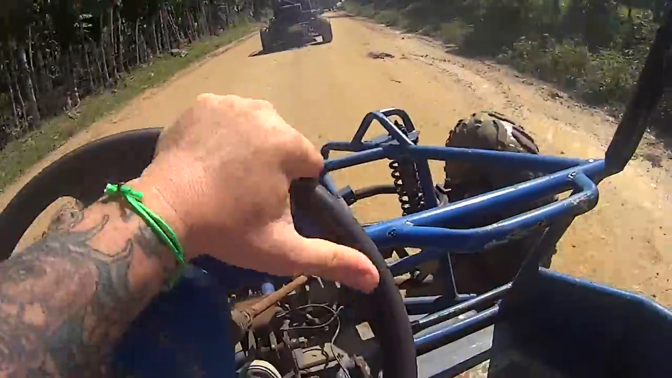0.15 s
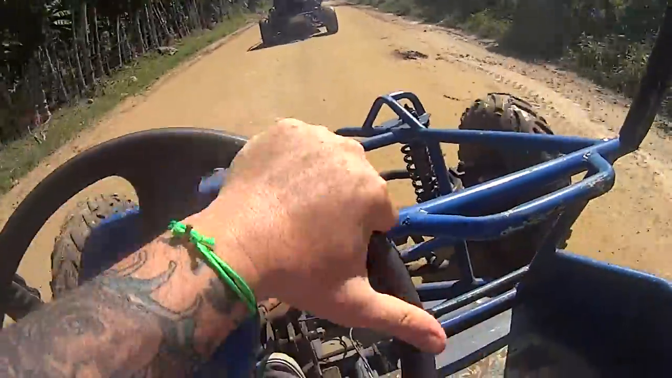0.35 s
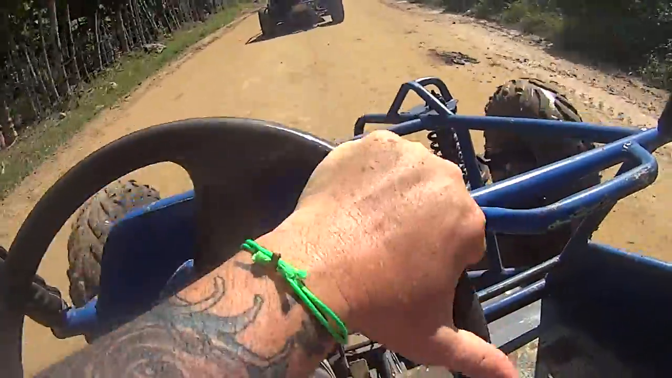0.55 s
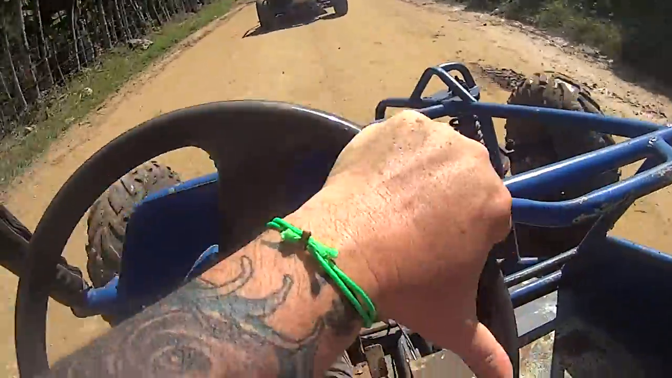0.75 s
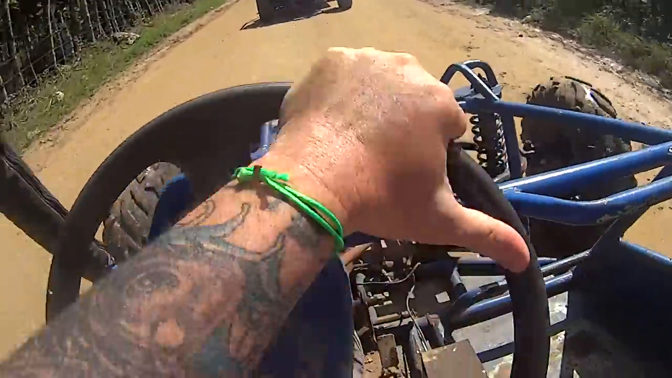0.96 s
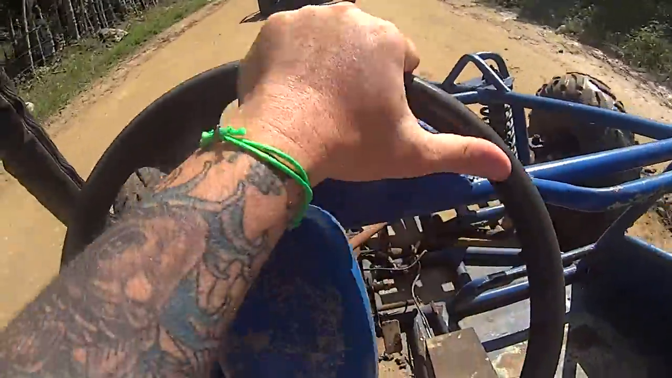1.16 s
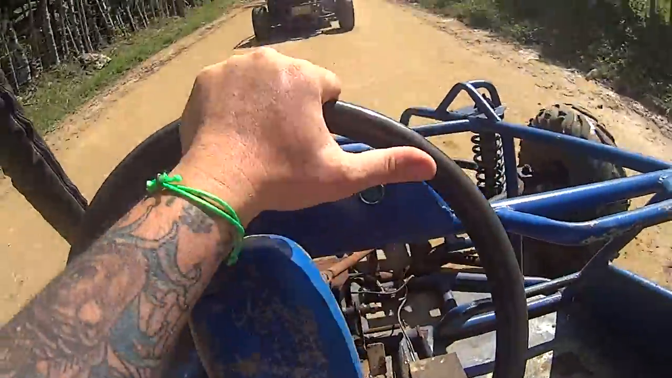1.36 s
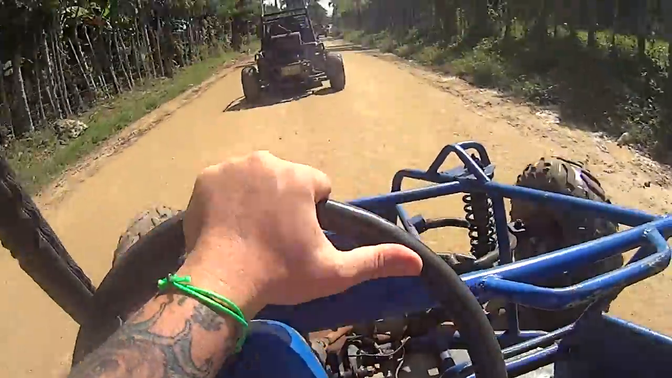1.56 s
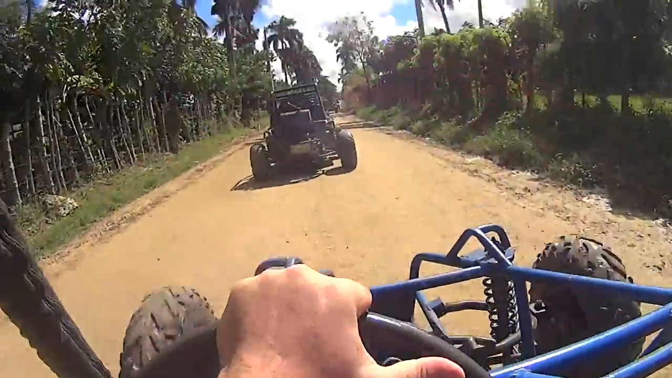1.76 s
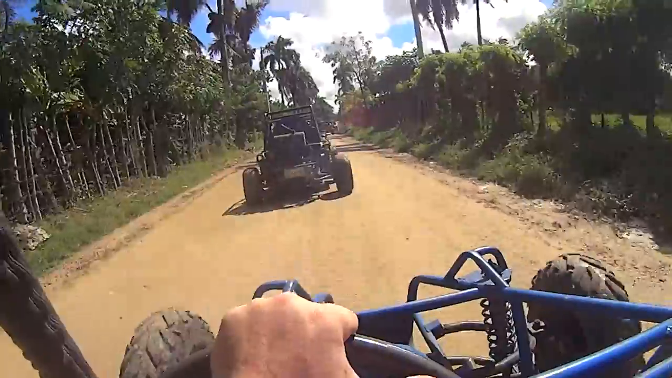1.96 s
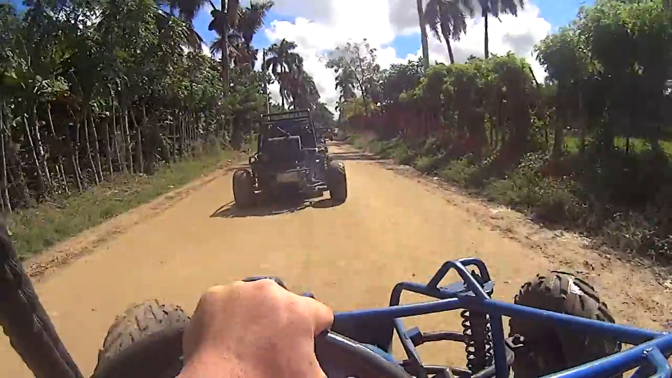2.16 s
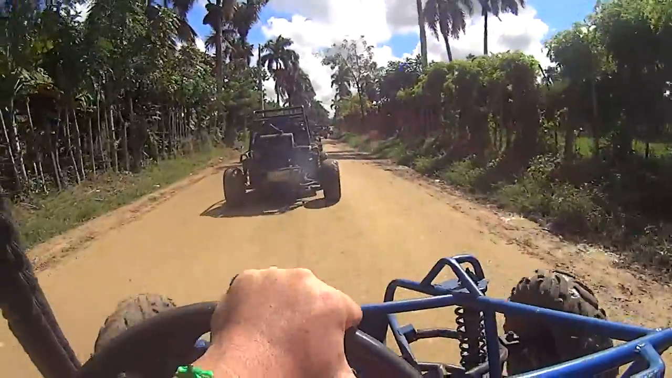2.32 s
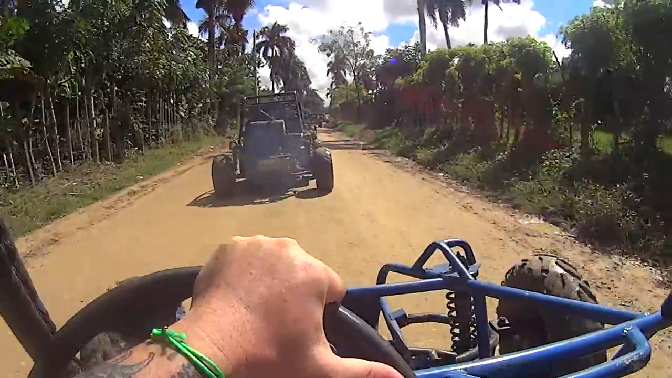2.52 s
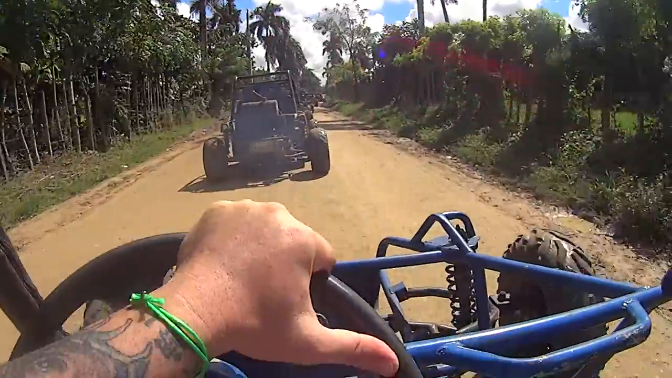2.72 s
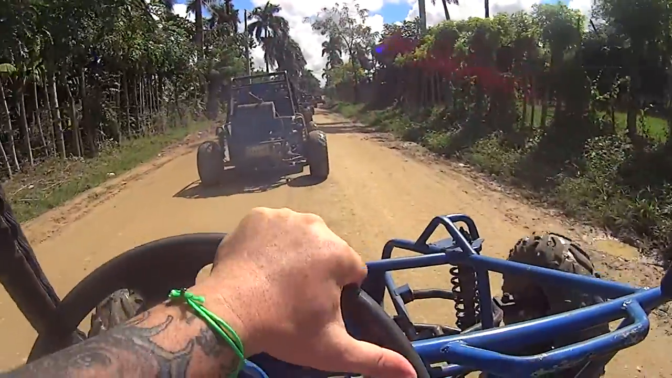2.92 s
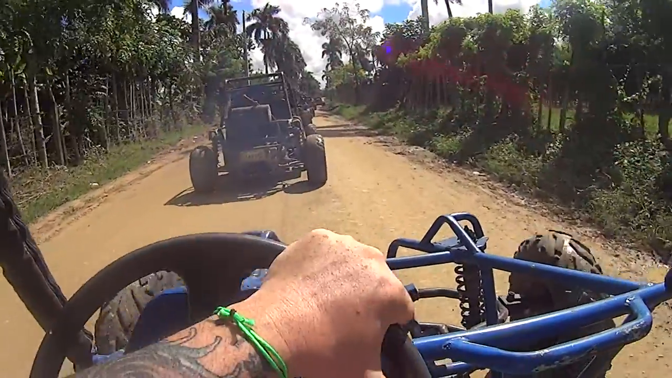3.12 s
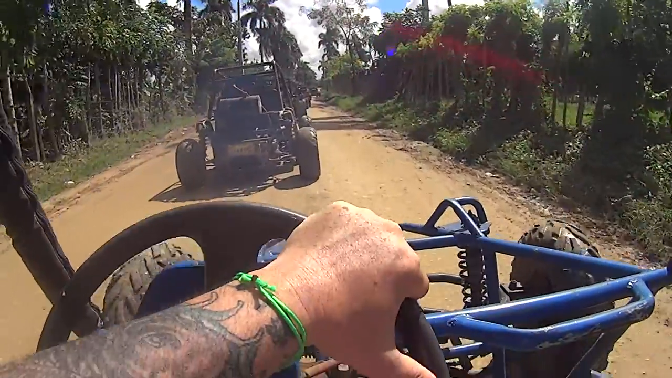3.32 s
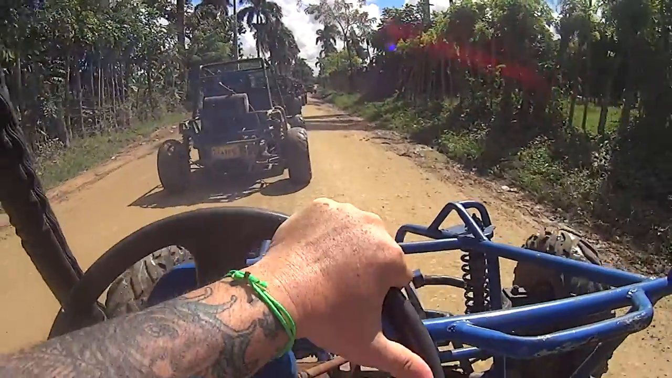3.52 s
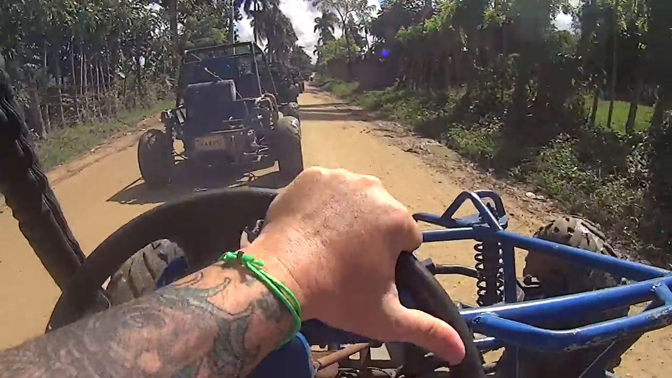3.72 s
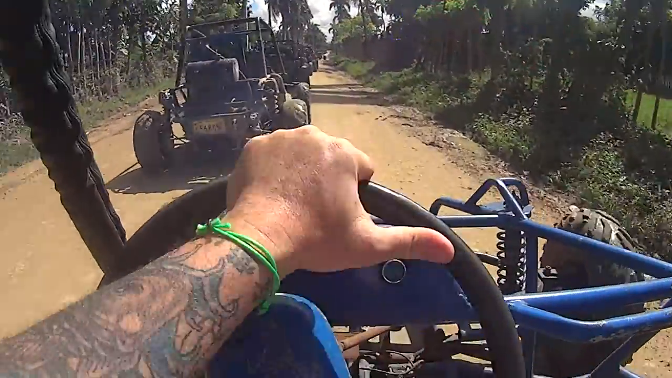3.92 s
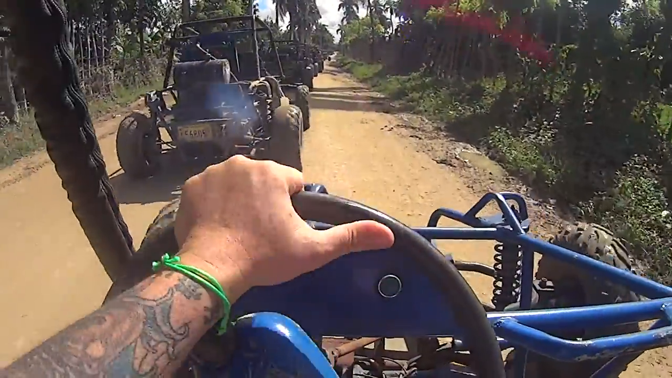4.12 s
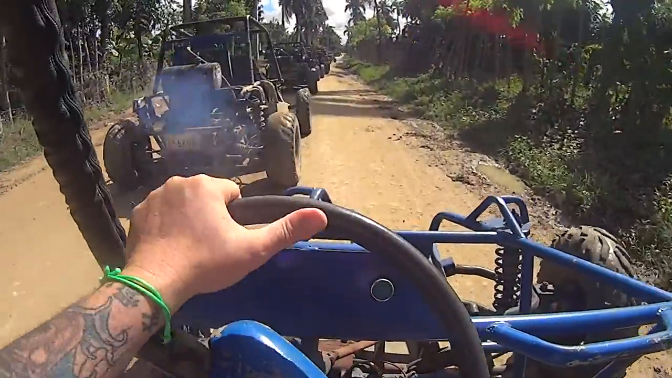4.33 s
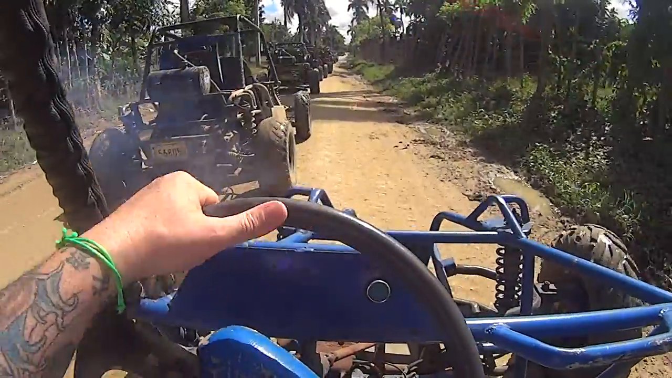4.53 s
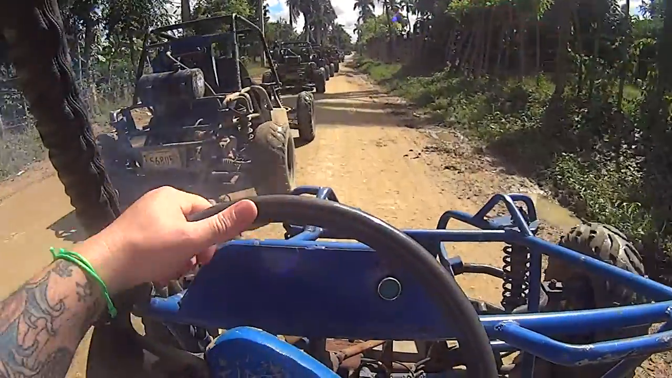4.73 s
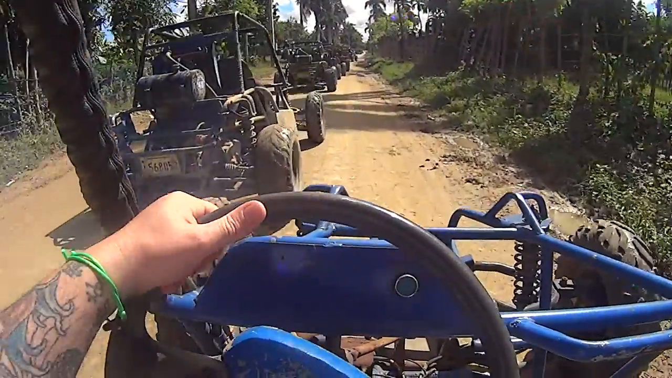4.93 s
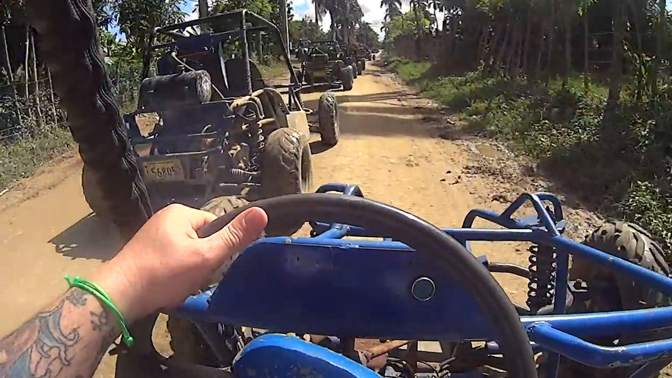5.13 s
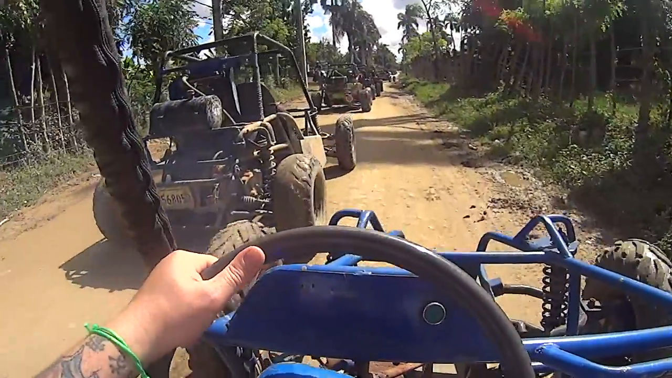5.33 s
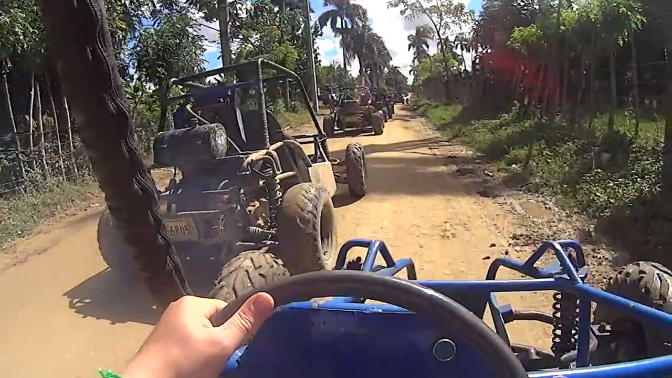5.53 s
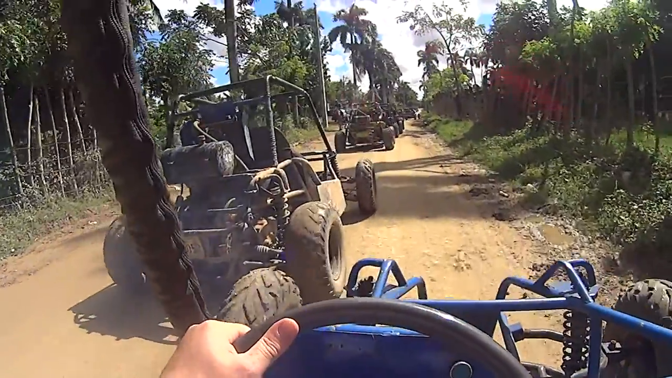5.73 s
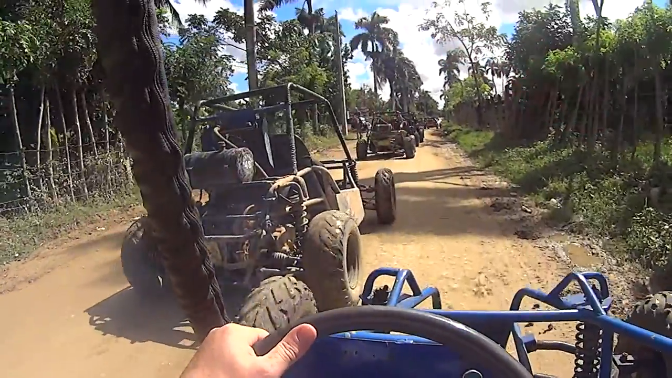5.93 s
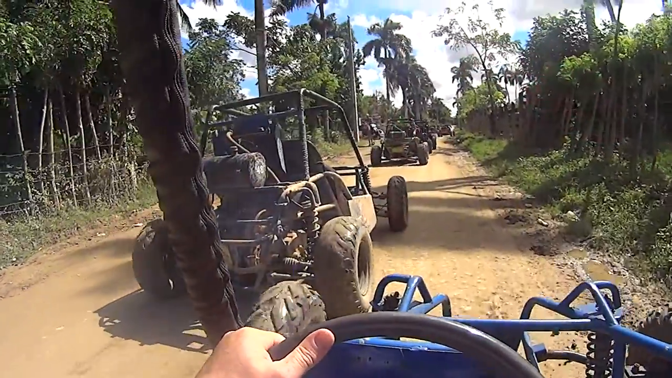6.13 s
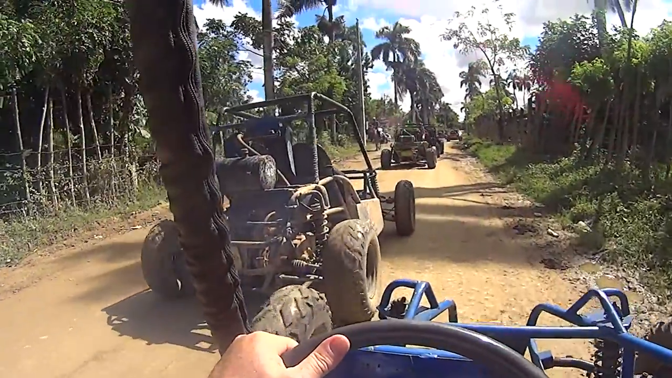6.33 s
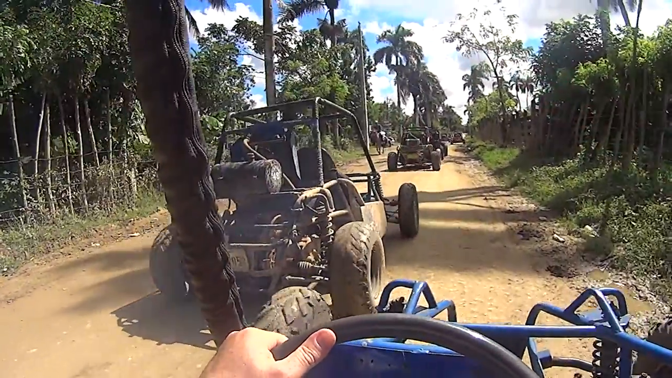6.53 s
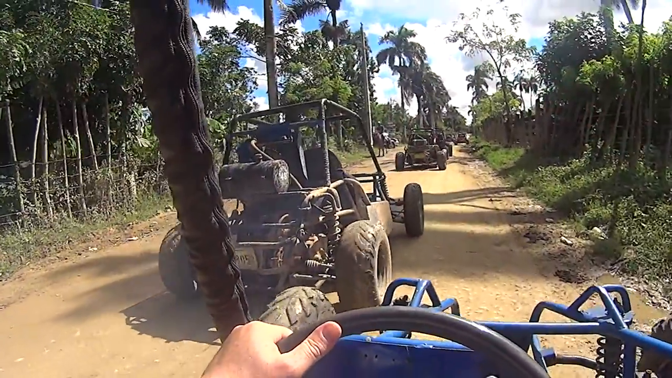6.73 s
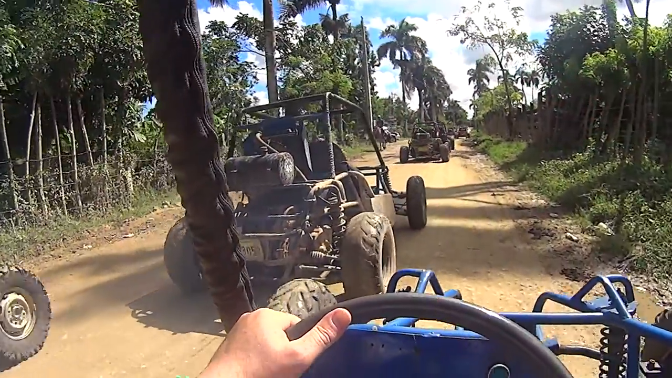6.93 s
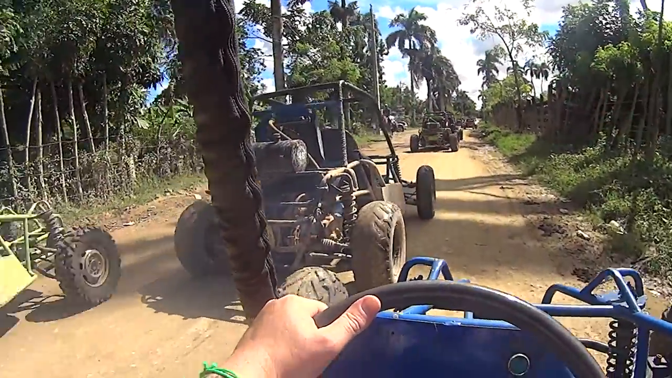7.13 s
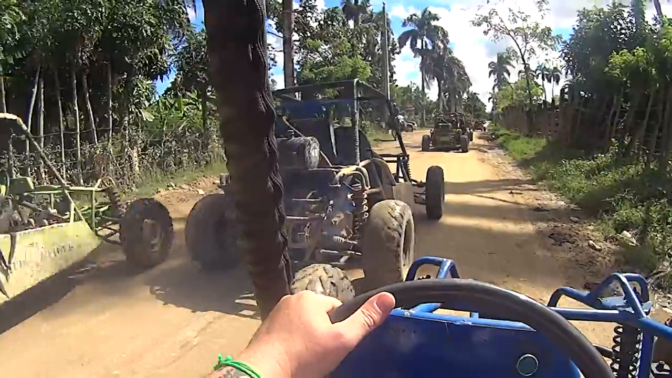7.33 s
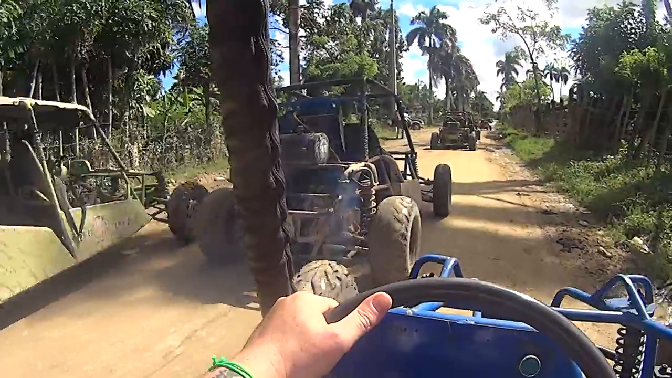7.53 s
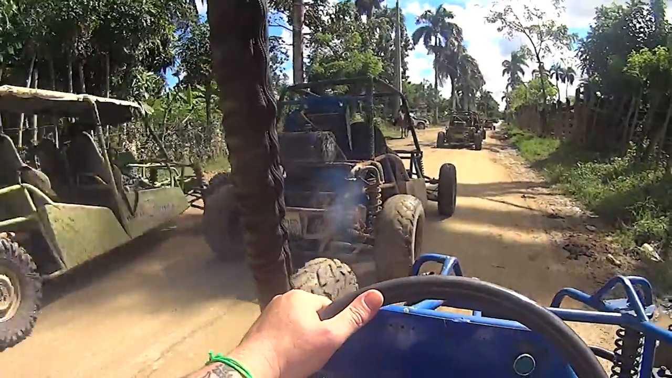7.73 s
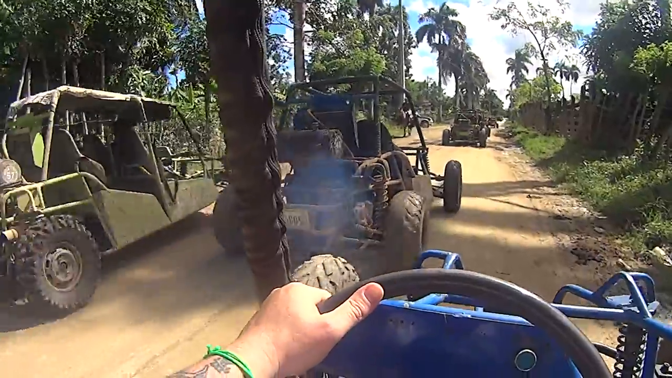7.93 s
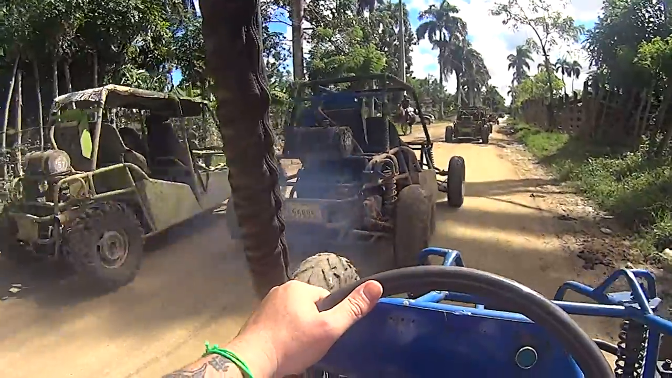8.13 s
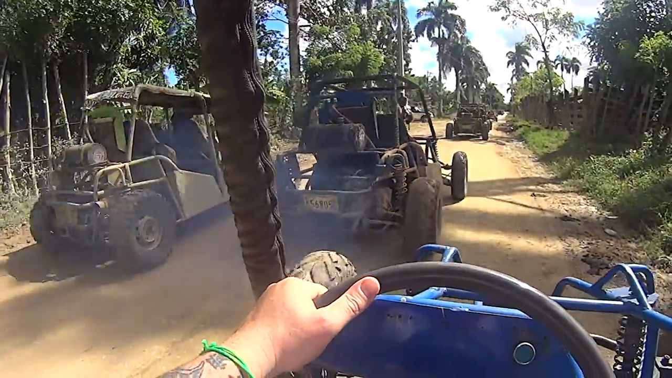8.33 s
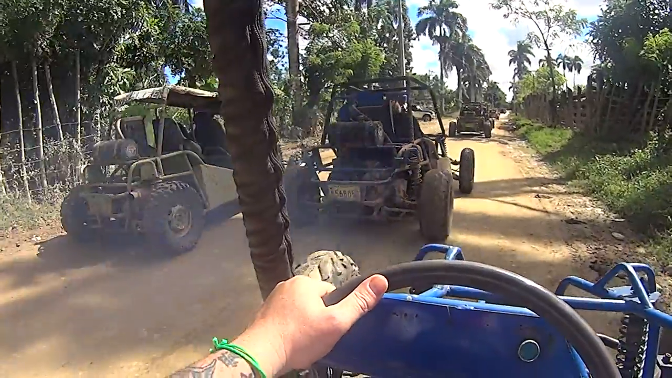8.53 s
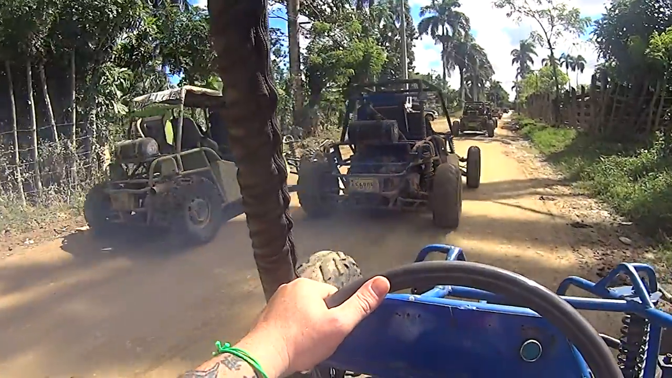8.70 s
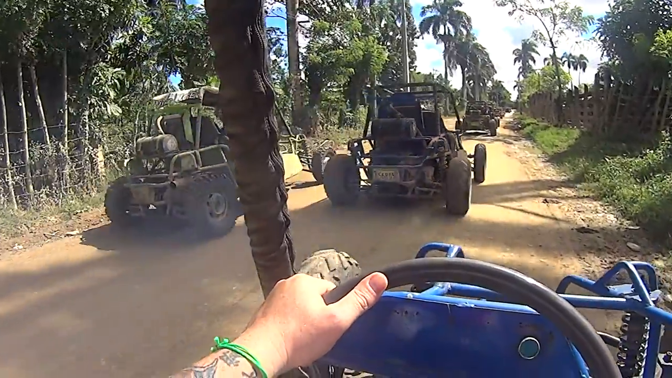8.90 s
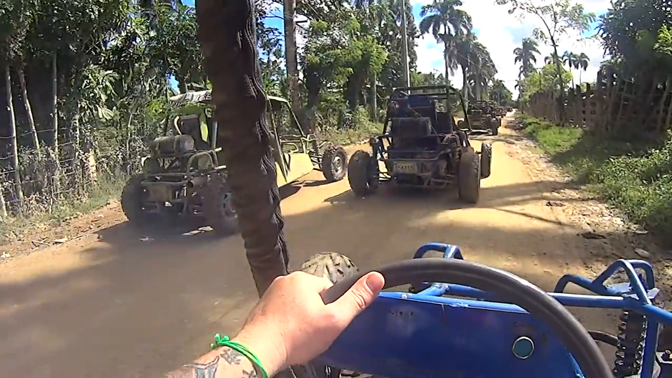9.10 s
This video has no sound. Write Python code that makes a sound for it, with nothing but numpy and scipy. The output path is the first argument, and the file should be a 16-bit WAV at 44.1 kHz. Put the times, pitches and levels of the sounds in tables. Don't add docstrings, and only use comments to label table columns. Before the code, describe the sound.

Boxy, ringing onboard sound of a buggy: raspy throttle bursts, falling coasts, a quieter lull, then a rough, popping final acceleration over low road rumble.

```python
import sys
import numpy as np
from scipy import signal
from scipy.fft import rfft, irfft, next_fast_len
from scipy.io import wavfile
from scipy.ndimage import uniform_filter1d, map_coordinates

SR = 44100
rng = np.random.default_rng(int(sys.argv[2]) if len(sys.argv) > 2 else 0)


def store_wav(level_fs):
    pcm = np.round(np.clip(np.atleast_2d(level_fs), -1, 1) * 32767)
    wavfile.write(sys.argv[1], SR, pcm.T.astype(np.int16))


def gain_from_decibels(decibels):
    exponent = np.asarray(decibels, float) / 20
    return 10 ** exponent


N = 403956


def unit(x):
    return x / np.sqrt(np.mean(x ** 2) + 1e-20)


def along(points, hz):
    f, v = np.transpose(points)
    return np.interp(np.log(hz + 1), np.log(f + 1), v)


def curves(rows):
    s, *cols = np.transpose(rows)
    return [np.interp(np.arange(N) / SR, s, c) for c in cols]


def fade(rows, soft_s):
    a, b = rows[0][0], rows[-1][0]
    return np.interp(np.arange(N) / SR, [a - soft_s, a, b, b + soft_s], [0, 1, 1, 0])


def wobble(rate_hz):
    knots = rng.standard_normal(int(N * rate_hz / SR) + 4)
    return map_coordinates(knots, [np.arange(N) * rate_hz / SR])


def filtered(x, response):
    m = next_fast_len(N + SR // 2)
    return irfft(rfft(x, m) * response(np.fft.rfftfreq(m, 1 / SR)), m)[..., :N]


def resonance(f, centre_hz, width_hz):
    damping = 1j * f * width_hz
    return damping / (centre_hz ** 2 - f * f + damping)


def modes(rows):
    return lambda f: sum(gain_from_decibels(db) * resonance(f, c, w) for c, w, db, *_ in rows)


def blows(events, over_db):
    s, db = np.transpose(events)
    return np.bincount(np.round(s * SR).astype(int), gain_from_decibels(db + over_db), N)


# [f/Hz, share 0-1]
COMMON_SHARE = [(80, .7), (400, .6), (650, .5), (900, .88), (1300, .85), (1480, .998), (1850, .996),
                (2400, .9), (3500, .7), (5200, .88), (7000, .5), (10000, .3)]


def ports(x, response):
    m = next_fast_len(N + SR // 2)
    f = np.fft.rfftfreq(m, 1 / SR)
    z, h = rfft(x, m), response(f)
    share = np.clip(along(COMMON_SHARE, f), 0, 1)
    pair = np.sqrt(share) * z[0] + np.sqrt(1 - share) * z[1:]
    return irfft(pair * h / np.sqrt(np.mean(np.abs(h) ** 2)), m)[:, :N]


# [f/Hz, width/Hz, left level/dB, right level/dB, left sign, right sign]
SHELL = [(896, 160, -17, -16.5, 1, 1), (1030, 106, -13, -20, -1, -1), (1280, 73, -16, -19, 1, 1),
         (1526, 63.5, 2.5, 3.5, 1, 1), (1653.6, 70.5, 0.5, -0.5, -1, -1), (1782, 55, -4.5, -6.5, 1, 1),
         (1957, 390, -19, -25, -1, -1), (2356, 74, -15, -29.5, -1, 1), (2640, 350, -20, -24, 1, -1),
         (2663, 360, -21.5, -21, -1, 1), (3220, 520, -18, -19.5, 1, -1), (4070, 380, -23.5, -18.5, -1, 1),
         (4365, 530, -21.5, -23, 1, -1), (5070, 493, -20.5, -14, 1, 1), (5350, 1050, -25, -18.5, -1, -1),
         (7140, 140, -45.5, -47, 1, -1), (7730, 495, -31, -28.5, -1, -1), (9190, 470, -29.5, -39.5, 1, 1),
         (9580, 4400, -38, -37, -1, 1)]


def shell(f):
    return sum(gain_from_decibels([[l], [r]]) * [[a], [b]] * resonance(f, c, w) for c, w, l, r, a, b in SHELL)


# [t/s, firing f/Hz]
SPEED = [(0, 27.2), (0.558, 43.97), (0.891, 35.07), (1.099, 41.74), (1.399, 78.74), (1.74, 113.6),
         (1.981, 95.8), (2.41, 134), (3.05, 92.28), (3.92, 46.67), (4.5, 105.7), (4.85, 86.4),
         (5.66, 133.5), (6.15, 101.4), (7.62, 25.44), (8.071, 59.53), (8.291, 65.37), (9.16, 73.17)]
# [open t/s, shut t/s, case ring level/dB and pipe thump level/dB at 100 Hz, burst share 0-1]
REVS = [
    (1.103, 1.744, -14.5, -28.5, 0.24),
    (1.999, 2.411, -13.5, -35, 0.07),
    (4.012, 4.513, -15, -31.5, 0.75),
    (4.753, 4.801, -13.5, -39, 0.1),
    (4.845, 5.661, -13.5, -36, 0.78),
    (7.734, 9.3, -15.5, -22, 0.8),
]


def throttle():
    fill_firings, fill_curve, empty_s = 6.9, 0.34, 0.038
    s, hz = np.transpose(SPEED)
    rows = []
    for a, b, *_ in REVS:
        full = min(a + fill_firings / np.interp(a, s, hz), b)
        rows.append(np.interp(np.arange(N) / SR, [a, full, b, b + empty_s], [0, 1, 1, 0]))
    return np.array(rows) ** fill_curve


# [rasp, hiss, bark, heat shield level/dB re case ring, thump growth/dB per octave of speed]
FACING = [
    (-14.5, -21.5, -17.5, -30, -4),
    (-15, -21.5, -23, -29.5, -8.5),
    (-9, -18, -14, -18, -4),
    (-24, -22.5, -16, -32, -3),
    (-31, -22, -20, -34, -24),
    (-10.5, -15.5, -19.5, -37, 21),
]
SHUT_COLOUR = (-15, -21, -19.5, -28)
# [pipe boom level/dB re thump, hiss growth/dB per octave of speed]
BOOM = [
    (-8, -4),
    (-13, 3.5),
    (-19, -1.5),
    (-16, 2),
    (-23, 6),
    (-21.5, -1),
]
# [t/s, case ring level/dB]
COAST = [(0, -29.5), (.45, -29), (.56, -26.5), (1.1, -27.5), (1.84, -24), (2.5, -21.5), (2.8, -27),
         (3.14, -27.5), (3.34, -23), (3.5, -29.5), (3.75, -29), (4.0, -24.5), (4.6, -19.5), (5.8, -24),
         (6.0, -28.5), (6.65, -31), (6.95, -34.5), (7.7, -35.5)]
# [firing f/Hz, level/dB]
FRAME = [(45, -63.5), (70, -56), (95, -45), (135, -53)]
# [t/s, level/dB]
THIRD = [(0, -59), (1.3, -56), (1.5, -49), (1.75, -40), (1.95, -37), (2.1, -44), (2.4, -40), (2.6, -36.5),
         (2.8, -45), (3.05, -43), (3.3, -64), (4.1, -51), (4.5, -49), (4.8, -49), (5.3, -51), (5.6, -49.5),
         (6.2, -58), (6.5, -65)]


def controls():
    (hz,), (coast_db,), opened = curves(SPEED), curves(COAST), throttle()
    hz = uniform_filter1d(hz, size=2500)
    load, octaves = opened.sum(0), np.log2(hz / 100)
    shut = 1 - load
    ring, thump, burst = np.transpose(REVS)[2:] @ opened
    *colour, grows = np.transpose(FACING) @ opened
    boom_db, brightens = np.transpose(BOOM) @ opened
    colour[1] = colour[1] + brightens * octaves
    colour_db = colour + np.outer(SHUT_COLOUR, shut)
    ring_db = ring + load * 4.5 * octaves + shut * coast_db
    coast_thump_db = coast_db - 27 + 7 * octaves
    thump_db = thump + grows * octaves + shut * coast_thump_db
    tones_db = along(FRAME, hz) + 5 * load, *curves(THIRD), boom_db - 12 * shut
    return hz, load, ring_db, thump_db, tones_db, burst + shut * 0.33, colour_db


LEADS = [1.167, 1.256, 1.305, 1.387, 1.461, 1.527, 1.59, 2.066, 2.129, 2.317, 2.366, 4.065, 4.159, 4.242,
         4.314, 4.38, 5.014, 5.077, 5.255, 5.31, 5.364, 7.845, 7.913, 8.027, 8.127, 8.223, 8.316, 8.406,
         8.496, 8.584, 8.672, 8.758, 8.843, 8.928, 9.011, 9.094]
OTHERS = [1.0975, 1.1448, 2.0263, 4.7586, 5.5935, 5.6146, 7.7625, 7.7916, 7.9538, 8.0621]
# [t/s, peak level/dB]
POPS = [(1.0703, -8), (1.1212, -8), (1.1456, 1), (1.209, 0), (1.2429, -6.5), (1.2614, -5), (1.2878, -7),
        (1.3057, -8), (1.3357, -8), (1.3891, -6), (1.4963, -6.5), (1.5292, -6), (2.0263, -4.5),
        (2.5077, -14.5), (3.1163, -11), (3.2575, -11), (4.115, -12), (4.5336, 0), (4.7586, -4.5),
        (4.8678, -6), (5.0384, -4.5), (5.2769, -6), (7.7638, -8.5), (7.7957, -15), (7.8222, -17),
        (7.8456, -11.5), (7.8696, -11.5), (7.894, -12.5), (7.913, -7), (7.9539, -4.5), (8.0282, -9.5),
        (8.0616, -1.5), (8.0801, -10), (8.1439, -9.5), (8.1774, -11.5), (8.2243, -11.5), (8.2397, -8),
        (8.2587, -7), (8.2706, -9), (8.317, -6.5), (8.3644, -4), (8.4073, -3.5), (8.4532, -7), (8.4877, -8),
        (8.5271, -6), (8.543, -7), (8.6209, -6), (8.6308, -7.5), (8.6732, -9.5), (8.7171, -11.5),
        (8.761, -13.5), (8.8034, -8.5), (8.8453, -6), (8.8882, -7), (8.9147, -9.5), (8.9296, -7.5),
        (9.013, -13.5), (9.0544, -6.5), (9.0883, -4.5), (9.1432, -5.5)]


def crank(hz, ring_db):
    turns = np.cumsum(hz) / SR + 1
    at = np.round(np.sort(LEADS + OTHERS) * SR).astype(int)
    slip = -np.unwrap(turns[at] % 1, period=1)
    turns = turns + 1 + uniform_filter1d(np.interp(np.arange(N), at, slip), size=1800)
    k = np.arange(2000)
    led = np.round(turns[np.round(np.array(LEADS) * SR).astype(int)])
    nearest = led[np.abs(k[:, None] - led).argmin(axis=1)]
    lead = (k - nearest) % 3 == 0
    pop_s, pop_db = np.transpose(POPS)
    hard, extra_db = np.round(pop_s * SR).astype(int), np.zeros(2000)
    extra_db[np.round(turns[hard]).astype(int)] = np.clip(pop_db - ring_db[hard] - 8, -2, 4)
    return turns, lead[turns.astype(int)], extra_db


def firings(turns, cylinders_db, scatter_db, extra_db=0):
    k = turns.astype(int)
    size_db = np.resize(cylinders_db, 2000) + scatter_db * rng.standard_normal(2000) + extra_db
    return (turns - k) / np.gradient(turns) / SR, gain_from_decibels(size_db[k])


# [f/Hz, level/dB]
PIPE = [(40, -40), (65, -19), (100, -7), (150, -3), (220, -4), (290, -2), (370, 1), (450, -4), (520, -8),
        (600, -20), (720, -24), (900, -60)]
# [f/Hz, level/dB]
PIPE_LEFT = [(60, -16), (200, -41), (330, -16), (450, -8.5), (700, -3)]


def thumps(since, size, hz):
    puffs = size ** .4 * np.exp(-since / .0003) / np.sqrt(hz)
    pair = filtered(puffs, lambda f: gain_from_decibels(along(PIPE, f) + [along(PIPE_LEFT, f), 0 * f]))
    return pair / np.std(pair[1])


def engine():
    hz, load, ring_db, thump_db, tones_db, share, colour_db = controls()
    tone_db, third_db, boom_db = tones_db
    rasp_db, hiss_db, bark_db, shield_db = colour_db
    turns, lead, extra_db = crank(hz * (1 + .002 * wobble(25)), ring_db)
    since, size = firings(turns, [0], 2.2, extra_db)

    pipe = thumps(since, size * gain_from_decibels(4.7 * lead), hz)
    boom = filtered(pipe, modes([(384, 74, 6)]))
    out = gain_from_decibels(thump_db + 3) * (pipe + gain_from_decibels(boom_db) * boom)
    sides = gain_from_decibels([[-6], [3]])
    out = out + gain_from_decibels(tone_db + 2) * np.sin(2 * np.pi * turns) * sides
    out = out + gain_from_decibels(third_db + .8 * wobble(14)) * np.sin(6 * np.pi * turns) * sides

    gas_lead = round(.025 * SR)
    early_db = np.minimum(np.roll(ring_db, -gas_lead) - ring_db, 0)
    fires = np.diff(since, prepend=0) < 0
    edge = np.sqrt(size) * fires * np.sqrt(SR / hz)
    # from/Hz, to/Hz, level/dB, burst/s, burst depth, lead cylinder level/dB, share of clean fronts
    layers = [(696, 1180, bark_db, .0022, .37, 7.9, .7),
              (1475, 2700, .015, .0042, .45, 3, .55),
              (2070, 4250, rasp_db + early_db, .0082, .62, 1.9, .25),
              (3730, 12500, hiss_db + early_db, .0044, 1, 1.5, .12)]
    for lo_hz, hi_hz, db, life_s, depth, lead_db, clean in layers:
        favour = gain_from_decibels(lead_db * lead * load) / np.sqrt((2 + gain_from_decibels(2 * lead_db * load)) / 3)
        lives = life_s * hz
        level = np.sqrt(2 / lives / (1 - np.exp(-2 / lives)))
        burst = favour * size * np.exp(-since / life_s) * level
        mix = np.clip(depth * share, 0, 1)
        flutter = gain_from_decibels(.11 * wobble(25) + 1.02 * wobble(45))
        gate = np.sqrt(1 - mix + mix * burst ** 2) * flutter
        sharp = np.clip(np.maximum(mix ** 2, (hz - 35) / 40 * mix ** .3), 0, 1)
        fronts = clean * (.45 + .55 * load) * sharp
        hiss = np.sqrt(1 - fronts) * gate * rng.standard_normal((3, N))
        gas = hiss + np.sqrt(fronts) * favour * edge * [[1], [1], [1]]
        band = lambda f: shell(f) / np.sqrt((1 + (lo_hz / (f + 1)) ** 16) * (1 + (f / hi_hz) ** 16))
        out = out + ports(gas * gain_from_decibels(ring_db + db), band)

    shield = lambda f: resonance(f, 3310, 130) * gain_from_decibels([[1], [-1]])
    return out + ports(gas[[1, 1, 1]] * gain_from_decibels(ring_db + shield_db), shield)


def knocks():
    return filtered(blows(POPS, 21), modes(SHELL[3:6]))


# [t/s, firing f/Hz, thump level/dB]
BLIP = [
    (3.0, 40.9, -54),
    (3.118, 47.8, -54),
    (3.182, 54.3, -43),
    (3.294, 61.0, -42),
    (3.432, 63.3, -45),
    (3.5, 63.8, -51),
]
# [t/s, f/Hz, level/dB]
DRONE = [
    [(0.0, 77, -49), (0.36, 86.54, -36), (1.41, 79.7, -38), (1.54, 92.85, -45), (2.18, 79, -54),
     (3.13, 89.3, -39), (3.5, 78.35, -43), (4.27, 80.2, -37), (4.6, 93, -35.5)],
    [(6.6, 93.4, -54), (7.4, 88.3, -54), (7.712, 86.3, -48), (8.2, 100.5, -41)],
]
# [t/s, f/Hz, level/dB]
WHINE = [
    [(.45, 590, -56), (.65, 545, -45), (.95, 498.7, -55)],
    [(2.0, 516, -52), (2.5, 538.6, -51.5), (3.1, 551.4, -57), (3.5, 572.2, -67), (3.8, 526, -46),
     (4.4, 517, -53)],
]


def neighbours():
    hz, db = curves(BLIP)
    since, size = firings(np.cumsum(hz) / SR + 1, [1, -1, .6, -.6], 1.5)
    blip = fade(BLIP, .08) * gain_from_decibels(db + 18) * thumps(since, size, hz)
    blip = filtered(blip, lambda f: 1 / (1 + (f / 280) ** 6))
    return blip + hum(DRONE, 1.2) * gain_from_decibels([[-5], [3]]) + hum(WHINE, 2) * gain_from_decibels([[-1], [2]])


def hum(tables, waver_hz):
    out = 0
    for rows in tables:
        hz, db = curves(rows)
        phase = 2 * np.pi * np.cumsum(hz + waver_hz * wobble(8.9)) / SR
        out = out + fade(rows, .15) * gain_from_decibels(db + .81 * wobble(3.2)) * np.sin(phase)
    return out


# [t/s, peak level/dB]
THROBS = [(0.015, -23), (0.074, -21), (0.161, -25), (0.21, -18), (0.268, -26), (0.349, -23), (0.41, -18),
          (0.474, -19), (0.556, -19), (0.852, -22), (0.934, -27), (1.019, -27), (2.94, -29), (3.137, -26),
          (3.398, -25), (3.541, -26), (3.603, -28), (3.666, -26), (6.389, -40), (6.657, -41), (6.844, -38),
          (7.34, -38)]
# [f/Hz, width/Hz, level/dB]
BODY = [(82, 22, -3), (200, 55, -7), (310, 70, -16)]


def idle():
    soft = lambda f: modes(BODY)(f) / (1 + 1j * f / 420) ** 2
    return filtered(blows(THROBS, 40), soft) * gain_from_decibels([[-6], [2.5]])


def nearby_ring():
    centre_hz, width_hz, level_db, until_s = 1248, 71, -44.5, 1.06
    buzz = filtered(rng.standard_normal(N), lambda f: np.exp(-((f - centre_hz) / width_hz) ** 2))
    return gain_from_decibels(level_db + 2.5 * wobble(18.6)) * fade([[0], [until_s]], .1) * unit(buzz)


# [t/s, level/dB]
ROAD = [(0, -36.5), (1.12, -36.5), (1.81, -35.5), (2.47, -42), (2.93, -44.5), (3.21, -37), (3.5, -41.5),
        (4.54, -37.5), (5.05, -36.5), (5.38, -49), (6.4, -52), (7.0, -52), (8.0, -49), (9.16, -39.5)]
# [f/Hz, level/dB per Hz]
RUMBLE = [(25, -44), (55, -17.5), (76, -0.5), (118, -6.5), (188, -7), (230, -10.5), (400, -91)]
# [f/Hz, level/dB per Hz]
ROAR = [(90, -20), (150, -15.5), (190, -2.5), (320, 1.5), (400, -3), (450, -9.5), (600, -9.5), (750, -15.5),
        (1100, -86.5)]


def road():
    out, (roll_db,), load = 0, curves(ROAD), throttle().sum(0)
    rumble_db = roll_db - 0.5 - 2.5 * load
    roar_db = roll_db + 2.5 * load
    for db, colour, left_db in [(rumble_db, RUMBLE, -7), (roar_db, ROAR, -5)]:
        lumps_db = 2 + 2.2 * wobble(28) + 1.3 * wobble(6)
        noise = rng.standard_normal((3, N)) * gain_from_decibels(db + lumps_db)
        out = out + ports(noise, lambda f: gain_from_decibels(along(colour, f))) * gain_from_decibels([[left_db], [0]])
    return out


# [t/s, level/dB]
GUSTS = [
    (1.557, -32),
    (1.78, -32),
    (2.0, -29.5),
    (3.42, -38),
    (4.95, -46),
    (5.371, -36),
    (6.47, -44.5),
]


def gusts():
    t = np.arange(N) / SR
    push = sum(gain_from_decibels(db) * np.exp(-((t - s) / .022) ** 2) for s, db in GUSTS)
    noise = filtered(rng.standard_normal((2, N)), lambda f: (f > 55) / (1 + (f / 430) ** 6))
    return push * unit(noise) * gain_from_decibels([[0], [-8]])


def scene():
    return engine() + knocks() + neighbours() + idle() + nearby_ring() + road() + gusts()


def roll_off(x):
    return signal.sosfilt(signal.butter(12, 11920, fs=SR, output="sos"), x)


def record(dry):
    envelope = np.abs(signal.hilbert(dry.mean(0), next_fast_len(N + SR // 4))[:N])
    swell = uniform_filter1d(envelope, size=30)
    x = dry / (1 + (swell / .5) ** 4) ** (1 / 4)
    x = filtered(x, lambda f: 1 / np.sqrt((1 + (f / 10590) ** 60) * (1 + (26 / (f + 1)) ** 4)))
    return roll_off(x)


dry = scene()
out = record(dry)
store_wav(out)
```